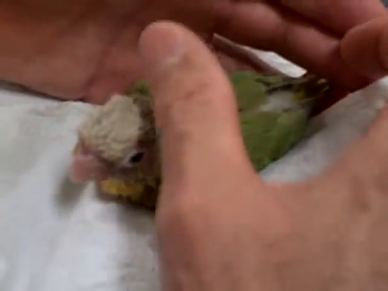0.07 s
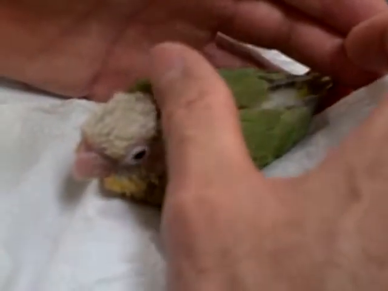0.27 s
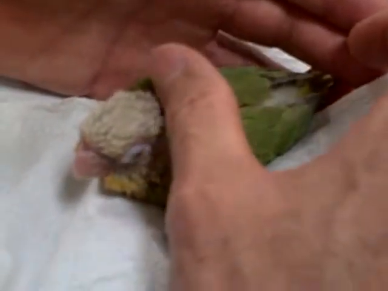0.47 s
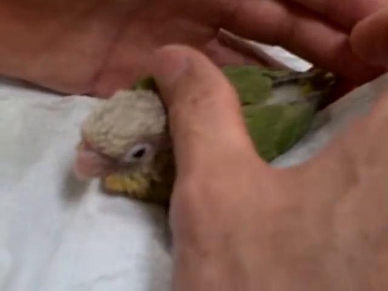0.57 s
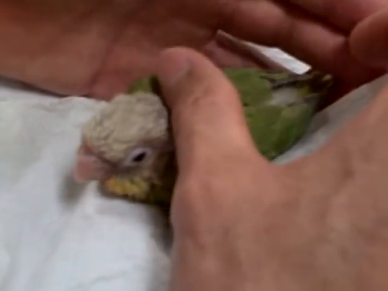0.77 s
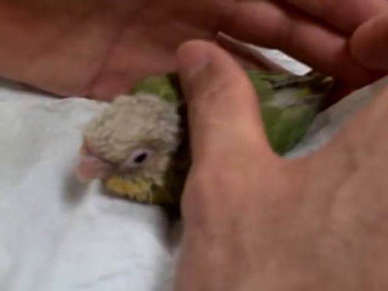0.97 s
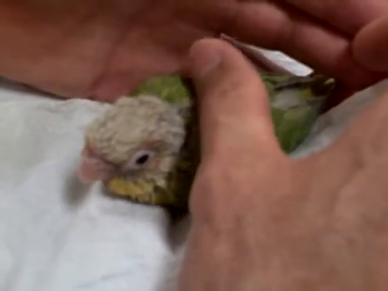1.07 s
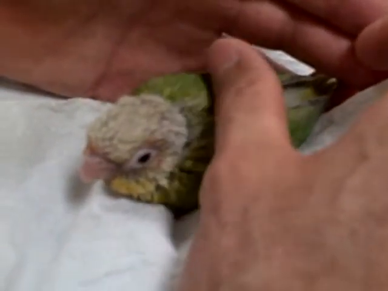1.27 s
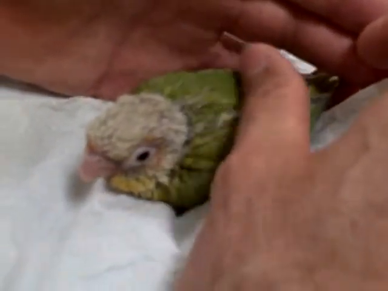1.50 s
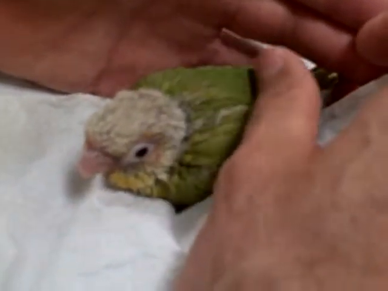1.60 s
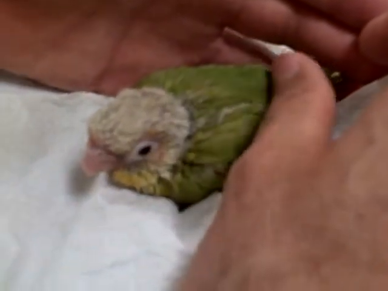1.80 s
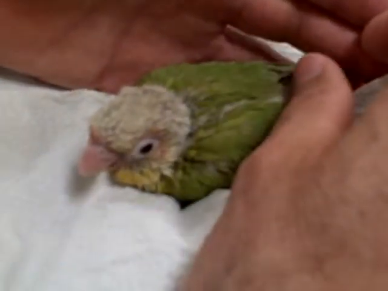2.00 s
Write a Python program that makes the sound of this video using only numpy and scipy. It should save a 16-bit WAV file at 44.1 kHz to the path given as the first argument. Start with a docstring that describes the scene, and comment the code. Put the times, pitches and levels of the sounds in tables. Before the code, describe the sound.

A parrot chick gives one loud, harsh, raspy growl from about 0.2 to 1 second, led in by a faint thin whistle. It slightly overloads the close microphone, over a dull handling rumble. From 1.1 seconds come two tiny cloth ticks and soft hissing strokes of a thumb on feathers, joined from 1.5 to 2 seconds by faint hoarse peeps. A low hum fills the small room throughout.

```python
"""A parrot chick is stroked on a cloth in a small room. A thin whistle leads into one harsh growl:
rough air, chopped by fluttering voice membranes, rings the throat, hisses through the beak and
overloads the microphone, over a dull handling rumble. Then the cloth ticks and soft strokes hiss
over the feathers, joined from 1.5 s by faint hoarse peeps. A low room hum runs throughout."""
import sys
import numpy as np
from scipy import signal
from scipy.fft import rfft, irfft
from scipy.io import wavfile

SR = 44100
rng = np.random.default_rng(int(sys.argv[2]) if len(sys.argv) > 2 else 0)


def log_audio(samples):
    """Write samples as a 16-bit WAV file to the path given in sys.argv[1]."""
    # one column per channel
    frames = np.atleast_2d(samples).T
    # limit to full scale, then quantise
    limited = np.clip(frames, -1, 1)
    pcm = np.round(limited * 32767).astype(np.int16)
    wavfile.write(sys.argv[1], SR, pcm)


N = 90404

# rustle of feathers and cloth (frequency [Hz], relative density [dB])
RUSTLE_SPECTRUM = [(400, 10), (1200, -4.5), (2200, 3), (3200, 5), (4200, 7), (6000, 5.5), (8000, -4.5),
                   (10000, -49)]


def growl(level_db=-10, shake_db=-.22, rasp_db=-5.5, chest_db=-21):
    """Puffs of turbulent air: first a broad rasp, then the throat rings and the beak hisses."""
    # push of air (time [s], relative level [dB])
    effort = [(.11, -44), (.16, -18), (.19, -7.5), (.24, -7.5), (.266, 2), (.315, -1.5), (.355, 2),
              (.43, -2.5), (.55, -.5), (.62, 0.6), (.69, -0.9), (.81, 1), (.875, -1.5), (.935, -8.5),
              (.99, -24.5), (1.09, -54)]
    # rush of air under the resonances (frequency [Hz], relative density [dB])
    rasp_spectrum = [(60, -36), (250, -19), (600, -14), (850, -6.5), (1400, -2), (2200, 3), (3300, 0.5),
                     (5000, 3.5), (7200, -2.5), (8200, -2.5), (9000, -32.5)]
    puffs = flutter()
    ring = throat_ring(puffs)
    hiss = beak_hiss(puffs)
    rasp = undb(rasp_db) * unit(colour(puffs * noise(), rasp_spectrum))
    chest = undb(chest_db) * unit(resonate(puffs * noise(), hz=333, width_hz=910))
    push = undb(level_db + curve(effort) + shake_db * walk(30))
    return push * (ring + hiss + rasp + chest)


def flutter(rate_hz=135.64, jitter=.3, decay_cycles=.46, depth=.32):
    """Envelope of unevenly flapping voice membranes: one puff of air per cycle."""
    cycles = np.cumsum(rate_hz * np.exp(jitter * walk(90))) / SR
    pulses = unit(np.exp(-(cycles % 1) / decay_cycles))
    return unit(1 - depth + depth * pulses)


def throat_ring(puffs, flicker_db=.8):
    """Puffed air rings the throat, crossfading between its narrow and open resonances."""
    # throat shape (time [s], opening [0-1], ring gain [dB])
    shape = [(.19, 0, -10.5), (.27, 0.27, -3.5), (.35, 0.3, -1.5), (.47, 0.3, 2.5), (.64, 0.49, -1),
             (.8, 0.97, -1.6), (.92, 0.46, 0.15), (1.02, 0.83, 4)]
    # resonances (narrow [Hz], open [Hz], width [Hz], narrow gain [dB], open gain [dB])
    formants = [(1567, 1440, 226, -5, -4), (1990, 1850, 300, -10, -9), (2528, 2475, 169, 2.5, 4.5),
                (2985, 2787, 260, -1.5, 4.5), (3566, 3760, 210, -3, 2.5), (3935, 3980, 360, -5.5, -2.5),
                (4876, 4860, 147, 1, -2), (5380, 5900, 180, -6.5, -2), (5900, 5400, 350, -2.5, 0.5),
                (6850, 7050, 770, -3.5, -3.5)]
    opening = curve(shape)
    ring = np.zeros(N)
    for narrow_hz, open_hz, width_hz, narrow_db, open_db in formants:
        narrow = undb(narrow_db) * resonate(puffs * noise() * np.sqrt(1 - opening), narrow_hz, width_hz)
        wide = undb(open_db) * resonate(puffs * noise() * np.sqrt(opening), open_hz, width_hz)
        ring += (narrow + wide) * undb(flicker_db * walk(44))
    return undb(curve(shape, column=2)) * unit(ring)


def beak_hiss(puffs, width_hz=580):
    """Air through the beak: a shrill noise band with a moving centre."""
    # hiss band (time [s], level relative to the push [dB], centre [Hz])
    track = [(.235, -28, 6156), (.265, -2, 6140), (.37, -3.5, 6270), (.45, -3.5, 6220), (.55, -21, 6130),
             (.61, -4, 6280), (.69, -10, 6456), (.79, -4, 6574), (.88, -13, 6550), (.97, -5, 6190)]
    phase = phase_of(curve(track, column=2))
    band = walk(width_hz / 2) * np.cos(phase) + walk(width_hz / 2) * np.sin(phase)
    return undb(curve(track)) * puffs * band


def feather_strokes():
    """A thumb slides over the feathers: Gaussian swells of hiss and rustle."""
    # strokes (peak [s], sigma [s], level [dB], centre [Hz], width [Hz], relative rustle [dB])
    strokes = [(0.147, 0.009, -31, 6060, 1300, -17), (1.109, 0.037, -31.5, 6400, 1400, -16),
               (1.334, 0.051, -31, 6570, 1300, -10), (1.476, 0.039, -35.5, 6000, 1100, -3.5),
               (1.573, 0.063, -28, 6340, 1200, -7.5), (1.723, 0.02, -33, 7060, 1400, -4),
               (1.831, 0.087, -28, 6500, 1716, -5), (1.96, 0.053, -30, 6550, 1270, -10),
               (2.039, 0.046, -24, 6300, 1200, -9)]
    out = np.zeros(N)
    for peak_s, sigma_s, level_db, centre_hz, width_hz, rustle_db in strokes:
        hiss = unit(resonate(noise(), centre_hz, width_hz))
        rustle = undb(rustle_db) * unit(colour(noise(), RUSTLE_SPECTRUM))
        swell = np.exp(-.5 * ((clock() - peak_s) / sigma_s) ** 2)
        out += undb(level_db) * swell * (hiss + rustle)
    return out


def peeps(jitter=.012, flicker_db=3, edge_s=.0072):
    """Short hoarse notes of which only harmonics 2-9 carry."""
    # peeps (start [s], length [s], pitch [Hz], glide [fraction], level [dB], centre [Hz], width [Hz])
    notes = [(1.53, .06, 792, 0, -35.5, 3100, 1700), (1.575, .075, 1185, -.04, -37.5, 4400, 1500),
             (1.695, .055, 1425, -.04, -33, 4250, 600), (1.715, .05, 1000, 0, -43, 3000, 600),
             (1.78, .045, 1065, 0, -41, 3200, 700), (1.795, .09, 673, .005, -32, 4700, 2800),
             (2.008, .045, 1360, -.05, -33.5, 4000, 700)]
    out, t = np.zeros(N), clock()
    for start_s, length_s, pitch_hz, glide, level_db, centre_hz, width_hz in notes:
        progress = np.clip((t - start_s) / length_s, 0, 1)
        phase = phase_of(pitch_hz * (1 + glide * progress + jitter * walk(296)))
        note = np.zeros(N)
        for k in range(2, 10):
            formant_gain = 1 / (1 + (2 * (k * pitch_hz - centre_hz) / width_hz) ** 2)
            note += formant_gain * np.sin(k * phase) * undb(flicker_db * walk(130))
        gate = np.clip(np.minimum(t - start_s, start_s + length_s - t) / edge_s, 0, 1)
        out += undb(level_db) * gate * unit(note)
    return out


def whistle(jitter=.018):
    """A thin wavering tone before the growl."""
    # whistle contour (time [s], pitch [Hz], level [dB])
    contour = [(.025, 6420, -55), (.045, 6470, -40.5), (.058, 6630, -30), (.075, 6550, -40),
               (.098, 6770, -42), (.135, 6680, -66)]
    phase = phase_of(curve(contour) * (1 + jitter * walk(400)))
    gate = (clock() > contour[0][0]) & (clock() < contour[-1][0])
    return undb(curve(contour, column=2)) * gate * unit(np.sin(phase))


def cloth_ticks(decay_s=.004):
    """Tiny snaps of the cloth: fast-decaying bursts of rustle."""
    # snaps (time [s], level [dB])
    snaps = [(0.047, -45), (1.095, -26.5), (1.319, -28.5)]
    t = clock()
    envelope = sum(undb(db) * (t > at_s) * np.exp(-np.abs(t - at_s) / decay_s) for at_s, db in snaps)
    return envelope * unit(colour(noise(), RUSTLE_SPECTRUM))


def handling_rumble():
    """Dull handling noise, surging while the chick strains."""
    # rumble envelope (time [s], level [dB])
    surges = [(.2, -53), (.27, -39), (.42, -36.5), (.52, -54), (.6, -37), (.7, -59), (.8, -33.5),
              (.88, -42), (.96, -46)]
    return undb(curve(surges)) * unit(resonate(noise(), hz=62, width_hz=120))


def room_tone(noise_db=-38.5, hum_hz=122.7, hum_db=-47.5):
    """Low room noise and mains hum."""
    # room noise (frequency [Hz], relative density [dB])
    spectrum = [(20, -3.5), (45, -7.5), (75, 2), (95, -11.5), (150, -1.5), (300, -0.5), (580, -3),
                (800, -11), (1150, -15), (2000, -19.5), (3500, -21.5), (6500, -16.5), (9000, -28.5)]
    hum = unit(np.sin(2 * np.pi * hum_hz * clock()))
    return undb(noise_db) * unit(colour(noise(), spectrum)) + undb(hum_db) * hum


def walls(x, t60_s=.45, delay_s=.0031, echo_db=-3):
    """Add the diffuse echo of a small room, keeping the power."""
    t = clock()
    tail = noise() * undb(-60 * t / t60_s) * (t > delay_s)
    tail /= np.sqrt(np.sum(tail ** 2))
    echo = filtered(x, rfft(tail, 2 * N))
    return (x + undb(echo_db) * echo) / np.sqrt(1 + undb(echo_db) ** 2)


def undb(db):
    """Decibels to gain."""
    return 10 ** (np.asarray(db) / 20)


def unit(x):
    """Scale to rms 1."""
    return x / np.sqrt(np.mean(x ** 2) + 1e-18)


def clock():
    """Sample times [s]."""
    return np.arange(N) / SR


def curve(table, column=1):
    """One table column, interpolated linearly in time."""
    rows = np.array(table)
    return np.interp(clock(), rows[:, 0], rows[:, column])


def phase_of(hz):
    """Running phase [rad] of a varying frequency."""
    return 2 * np.pi * np.cumsum(hz) / SR


def freqs():
    """Bin frequencies [Hz], floored at 1."""
    return np.maximum(np.arange(N + 1) * SR / (2 * N), 1)


def filtered(x, gain):
    """Apply a frequency response."""
    return irfft(rfft(x, 2 * N) * gain)[:N]


def colour(x, points):
    """Filter by (frequency [Hz], gain [dB]) points."""
    hz, db = np.array(points).T
    return filtered(x, undb(np.interp(np.log(freqs()), np.log(hz), db)))


def resonate(x, hz, width_hz):
    """Steep resonance: two band-passes in series, each width_hz wide."""
    f = freqs()
    return filtered(x, (1 + 1j * (f / hz - hz / f) * hz / width_hz) ** -2)


def noise():
    """White noise."""
    return rng.standard_normal(N)


def walk(cutoff_hz):
    """Smooth random wander, rms 1."""
    return unit(filtered(noise(), 1 / (1 + (freqs() / cutoff_hz) ** 4)))


def scene():
    """Chick, hand and cloth in the room, over rumble and room tone; mono."""
    direct = growl() + feather_strokes() + peeps() + whistle() + cloth_ticks()
    return (walls(direct) + handling_rumble() + room_tone())[None]


def record(dry):
    """A dull microphone flattens the loudest peaks; a steep low-pass follows."""
    # microphone response (frequency [Hz], gain [dB])
    response = [(20, 0), (6800, -0.5), (7500, -2), (8000, -5), (8600, -8), (9100, -25), (9800, -105)]
    ceiling, hardness, cutoff_hz = .76, 9, 15850
    dull = colour(dry[0], response)
    clipped = dull / (1 + np.abs(dull / ceiling) ** hardness) ** (1 / hardness)
    low_pass = signal.ellip(10, .1, 80, cutoff_hz, fs=SR, output="sos")
    return signal.sosfilt(low_pass, clipped)[None]


dry = scene()
out = record(dry)
log_audio(out)
```